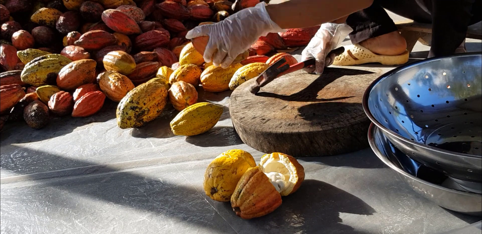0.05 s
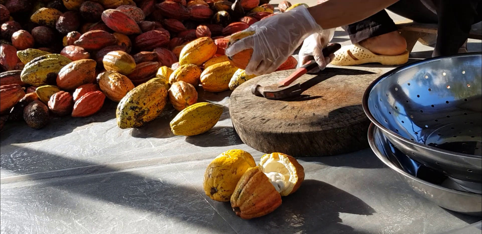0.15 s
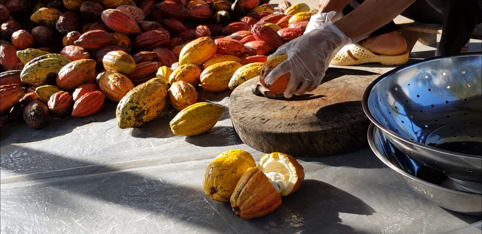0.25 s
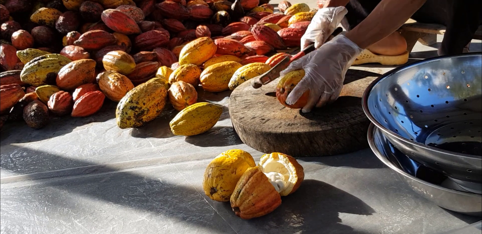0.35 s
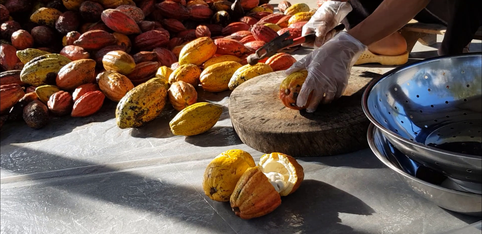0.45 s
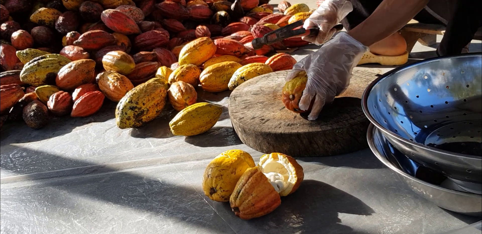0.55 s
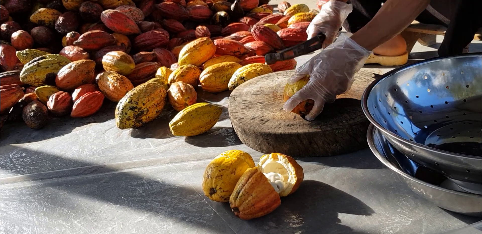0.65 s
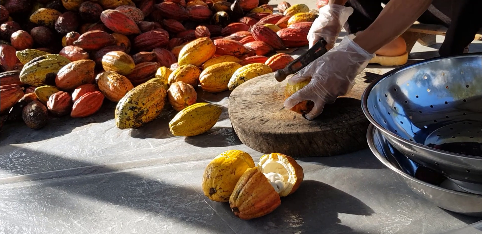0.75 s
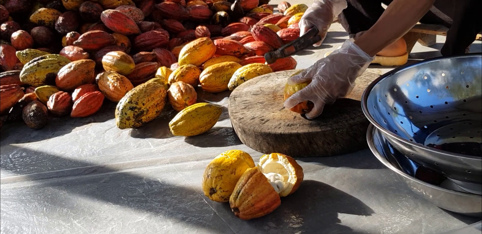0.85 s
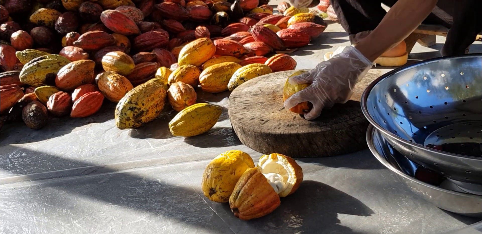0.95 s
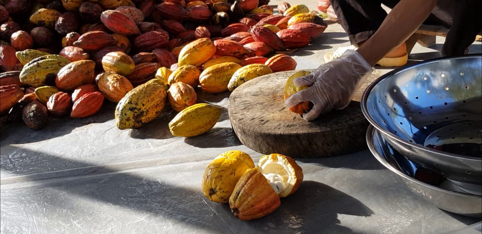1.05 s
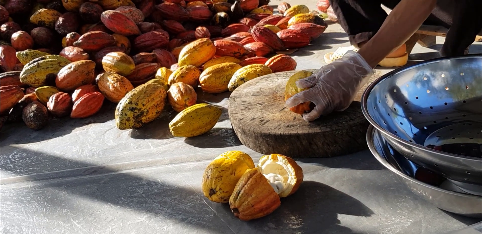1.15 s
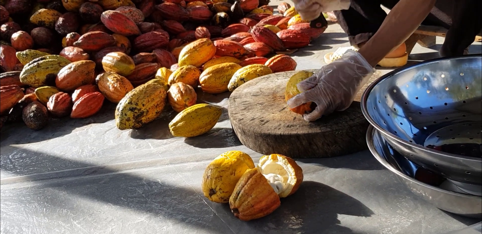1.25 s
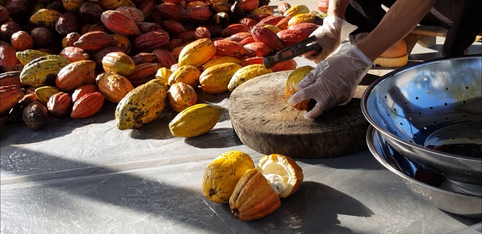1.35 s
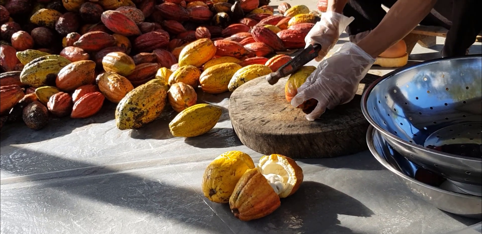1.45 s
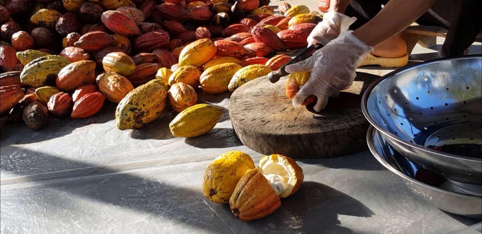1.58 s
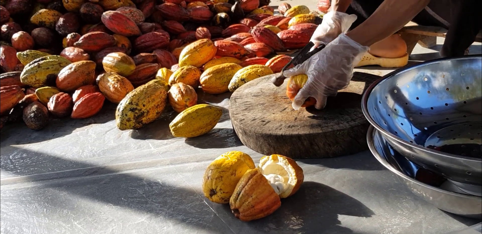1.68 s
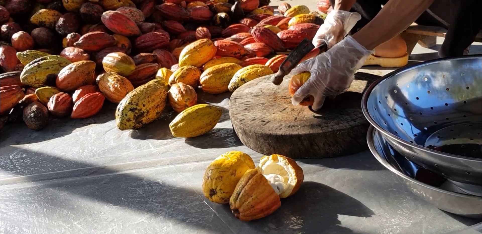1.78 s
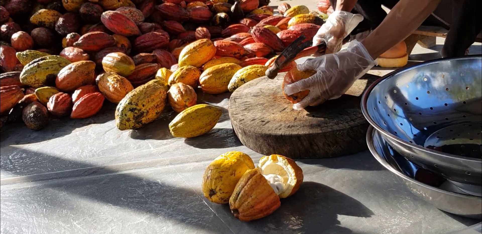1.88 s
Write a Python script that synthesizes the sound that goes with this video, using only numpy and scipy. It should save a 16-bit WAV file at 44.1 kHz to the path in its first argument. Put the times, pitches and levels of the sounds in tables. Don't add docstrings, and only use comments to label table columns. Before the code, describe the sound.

Close stereo pickup in a small covered yard: a tool knocks a bare wooden block, a pod is set down with a low thud, then a sharp crunching blow cracks it apart over faint rustling, thuds and hum.

```python
import sys
import numpy as np
from scipy import signal
from scipy.fft import rfft, irfft
from scipy.io import wavfile
from scipy.ndimage import uniform_filter1d

SR = 44100
rng = np.random.default_rng(int(sys.argv[2]) if len(sys.argv) > 2 else 0)


def invert_db(x):
    u = np.asarray(x, float) / 20
    return 10 ** u


def transcribe(u):
    v = np.clip(np.atleast_2d(u).T, -1, 1)
    q = np.round(v * 32767).astype(np.int16)
    wavfile.write(sys.argv[1], SR, q)


N = 83790
T = np.arange(N) / SR


def unit(x):
    return x / np.sqrt(np.mean(x ** 2))


def since(start_s):
    return np.clip(T - start_s, 0, None)


def decay(t, t60_s):
    return np.exp(-np.log(1000) * t / t60_s)


def shape(x, table):
    hz, db = np.array(table, float).T
    f = np.fft.rfftfreq(x.shape[-1], 1 / SR) + 1
    gain_db = np.interp(np.log(f), np.log(hz), db, left=-90)
    return irfft(rfft(x) * invert_db(gain_db), x.shape[-1])


def walk(rate_hz):
    k = int(SR / rate_hz)
    once = uniform_filter1d(rng.standard_normal(N), k)
    return unit(uniform_filter1d(once, k))


def grit(rate_hz, spread_db):
    hit = rng.random(N) < rate_hz / SR
    sign = rng.standard_normal(N)
    size = np.minimum(rng.exponential(size=N), 3)
    return unit(hit * sign * invert_db(spread_db * size))


def pair(x, pan_db, lag_s):
    f = np.fft.rfftfreq(N, 1 / SR)
    late = irfft(rfft(x) * np.exp(-2j * np.pi * f * lag_s), N)
    return np.array([late * invert_db(pan_db / 2), x * invert_db(-pan_db / 2)])


def widen(mid, side, wide_hz):
    side = signal.lfilter(*signal.butter(1, wide_hz, "high", fs=SR), side)
    return np.array([mid + side, mid - side])


def strike(contacts, push_s, modes):
    out = np.zeros(N)
    flip = np.sign(rng.standard_normal((8, 16)) + .5)
    flip[0] = 1
    for j, (start_s, db, tilt_db) in enumerate(contacts):
        t = since(start_s)
        push = 1 - np.exp(-t / push_s)
        for k, (hz, mode_db, t60_s) in enumerate(modes):
            gain = invert_db(db + mode_db + tilt_db * np.log2(hz / 900)) * flip[j, k]
            out += gain * np.sin(2 * np.pi * hz * t) * push * decay(t, t60_s)
    return out


def split_blow():
    # start_s, level_db, tilt_db_per_octave
    contacts = [
        (1.3843, -20, 2),
        (1.3868, -16, 3),
        (1.3955, -20, -2),
        (1.3995, -22, -2),
        (1.404, -25.5, -3),
        (1.413, -22.5, -0.5),
    ]
    # mode_hz, level_db, t60_s
    shell = [(236, -3, 0.021), (370, -1.5, 0.054), (450, -3, 0.026), (557, -1.5, 0.024), (734, -11, 0.034),
             (854, 5, 0.015), (930, -10, 0.059), (1200, -6, 0.032), (1501, -8, 0.037), (1820, -10, 0.025),
             (2214, -7, 0.025), (2797, -5.5, 0.012), (3665, -5.5, 0.0069)]
    return strike(contacts, 0.00022, shell)


def tearing():
    # start_s, level_db, rise_s, t60_s
    bursts = [
        (1.383, -22, .0002, 0.011),
        (1.3856, -16, 0.00021, .012),
        (1.394, -19, .0005, 0.018),
        (1.399, -22, .004, 0.1),
    ]
    # hz, level_db
    colour = [(300, -20), (1000, 4), (2000, -9.5), (3500, -3), (6000, -8.5), (9500, -13.5), (12000, -6),
              (16000, -25)]
    alike = 0.4
    env = 0
    for start_s, db, rise_s, t60_s in bursts:
        t = since(start_s)
        env = env + invert_db(db) * (1 - np.exp(-t / rise_s)) * decay(t, t60_s)
    one, left, right = (grit(rate_hz=5100, spread_db=2.5) for _ in range(3))
    both = np.sqrt(alike) * pair(one, 0, -0.00013) + np.sqrt(1 - alike) * np.array([left, right])
    return env * unit(shape(both, colour)) * invert_db(np.array([[-1.5], [1.5]]))


def block_knock():
    # start_s, level_db, tilt_db_per_octave
    contacts = [
        (.2318, -17, -3),
        (.2331, -14, 4),
        (.2378, -23, 3),
    ]
    # mode_hz, level_db, t60_s
    block = [(378, -16, 0.12), (485, 8, 0.015), (592, 0, 0.0296), (660, -12.5, 0.054), (800, -11.5, 0.085),
             (1392, -2.5, 0.054), (1464, -3.5, 0.065), (1596, 1, 0.018), (2270, -12, 0.014),
             (2491, -29, 0.17), (3110, -12, 0.0066), (256, -22, 0.027), (712, -4, .03)]
    return -strike(contacts, .0008, block)


def set_down():
    # start_s, level_db, tilt_db_per_octave
    contacts = [
        (.7672, -33, 1),
        (.784, -43, -6),
        (.792, -42, -7),
    ]
    # mode_hz, level_db, t60_s
    pod = [(292, 10, 0.015), (425, 5, 0.038), (623, -4.5, 0.06), (752, 3, .02), (900, 5, 0.015),
           (1240, 0.5, 0.0096)]
    return strike(contacts, .0008, pod)


def bowl():
    # mode_hz, level_db, t60_s
    ring_modes = [(877, -52, .75), (884, -62, .75)]
    # start_s, level_db, tilt_db_per_octave
    touch = [(1.872, -56, 0)]
    # mode_hz, level_db, t60_s
    touch_mode = [(955, 0, .4)]
    ring = strike([(1.53, 0, 0)], .05, ring_modes) * invert_db(2 * walk(25))
    return ring + strike(touch, .008, touch_mode)


def room(x):
    t = T[:SR // 2]

    def fading_noise(t60_s):
        build = 1 - np.exp(-t / 0.0029)
        return rng.standard_normal((2, len(t))) * build * decay(t, t60_s)

    tail = signal.lfilter(*signal.butter(1, 8550, fs=SR), fading_noise(0.23))
    tail = tail / np.sqrt(np.sum(tail ** 2) / 2)
    low = signal.lfilter(*signal.butter(2, 454, fs=SR), fading_noise(0.49)) / np.sqrt(SR / 100)
    mid, side = tail + invert_db(-8.5) * low
    tail = widen(mid, side, wide_hz=743)
    return invert_db(-5) * signal.fftconvolve(x[None], tail, axes=1)[:, :N]


def thuds():
    # start_s, level_db, pitch_hz, t60_s
    bumps = [(0.232, -22, 125, 0.049), (0.283, -41.5, 105.4, 0.34), (0.442, -23, 125, 0.047),
             (0.539, -32, 90, 0.087), (0.771, -5, 106.5, 0.024), (.775, -26.5, 69, 0.14),
             (0.839, -28.5, 131.3, 0.123), (0.887, -29.5, 105, 0.086), (1.087, -29, 99, 0.064),
             (1.386, -12, 147.4, 0.086), (1.388, -18, 64, 0.066), (1.471, -28, 116, 0.14),
             (1.43, -14.5, 157, 0.063), (1.51, -12, 99, 0.036), (1.574, -24.5, 86.4, 0.073),
             (1.634, -33, 96, 0.15), (1.694, -31, 106, 0.11), (1.783, -28, 93.3, 0.088),
             (1.879, -59, 95, .1)]
    rise_s, sag, sag_s = 0.0062, 0.54, 0.0033
    out = 0
    for start_s, db, hz, t60_s in bumps:
        t = since(start_s)
        turns = hz * (t + sag * sag_s * (1 - np.exp(-t / sag_s)))
        rise = (1 - np.exp(-t / rise_s)) ** 2
        out = out - invert_db(db) * np.sin(2 * np.pi * turns) * rise * decay(t, t60_s)
    return out


def rustle():
    # time_s, level_db
    movement = [(0, -49.5), (.16, -44.5), (.22, -43), (.35, -53), (.43, -43.5), (.5, -50.5), (.56, -45.5),
                (.61, -48), (.67, -46.5), (0.782, -48), (.9, -54.5), (.98, -58), (1.03, -52), (1.302, -52),
                (1.54, -57.5), (1.7, -58), (1.75, -53), (1.9, -52.5)]
    # hz, level_db
    sheet = [(300, -23), (800, -1), (1800, -4.5), (3500, 2), (7500, 2.5), (10000, -2.5), (13500, 3.5),
             (16200, -3.5)]
    # start_s, peak_db
    ticks = [(.526, -48), (.736, -50), (.769, -50), (1.098, -51), (1.242, -53), (1.31, -55)]
    alike, pan_db = 0.3, -4
    near = pair(grit(rate_hz=8700, spread_db=7.8), 0, .0001)
    both = np.sqrt(alike) * near + np.sqrt(1 - alike) * rng.standard_normal((2, N))
    both = unit(shape(both, sheet))
    s, db = np.array(movement).T
    env = invert_db(np.interp(T, s, db) + 1.4 * walk(70))
    for start_s, tick_db in ticks:
        env = env + invert_db(tick_db) * (T > start_s) * np.exp(-since(start_s) / 0.0031)
    return invert_db(np.array([[pan_db], [-pan_db]]) / 2) * env * both


def hum():
    # time_s, pitch_hz, level_db
    motor = [(0, 58, -66), (.59, 60, -64), (.625, 61, -48), (.8, 61, -47), (.95, 62, -44), (1.37, 62, -43),
             (1.45, 63, -48), (1.6, 64, -46), (1.75, 59, -50), (1.9, 61, -47)]
    s, hz, db = np.array(motor).T
    pitch_hz = np.interp(T, s, hz) * (1 + 0.014 * walk(36))
    phase = 2 * np.pi * np.cumsum(pitch_hz) / SR
    gain = np.sqrt(2) * invert_db(np.interp(T, s, db) + .8 * walk(5))
    return gain * (np.sin(phase) + invert_db(-16) * np.sin(2 * phase + 0.43))


def yard():
    # hz, level_db
    colour = [(25, -11.5), (50, 1.5), (100, 0), (210, -3.5), (350, -12), (700, -22), (1200, -28.5)]
    # time_s, swell_db
    swell = [(0, 4), (.4, 1.5), (.7, 1.5), (.9, 1.5), (1.3, -1), (1.55, 9), (1.9, -4.2)]
    mid, side = (shape(rng.standard_normal(N), colour) for _ in range(2))
    swell_db = np.interp(T, *np.array(swell).T)
    return unit(widen(mid, side, wide_hz=840)) * invert_db(-55.5 + swell_db + 2.5 * walk(20))


def scene():
    knock, pod, blow, tear = block_knock(), set_down(), split_blow(), tearing()
    wet = invert_db(-3.5) * room(knock) + invert_db(-8) * room(pod)
    wet = wet + invert_db(-2.5) * room(blow) + invert_db(-2) * room(tear.mean(axis=0))
    hits = pair(knock + pod + blow + bowl(), -1.7, .00005)
    low = pair(thuds() + hum(), -1.8, .0001)
    dull = signal.ellip(8, .5, 60, 15700, fs=SR, output="sos")
    around = signal.sosfilt(dull, wet + rustle() + yard())
    return hits + tear + low + around


def band_limit(x):
    return signal.sosfilt(signal.butter(12, 16640, fs=SR, output="sos"), x)


def record(dry):
    low_cut = signal.butter(2, 38, "high", fs=SR, output="sos")
    mix = signal.sosfilt(low_cut, dry)
    return band_limit(mix)


dry = scene()
out = record(dry)
transcribe(out)
```